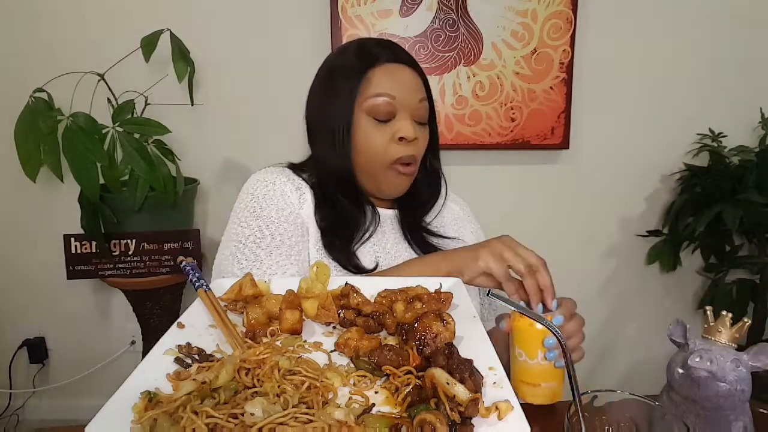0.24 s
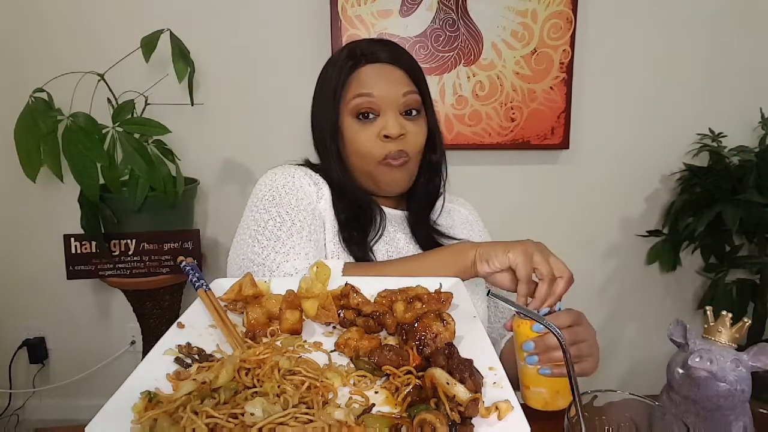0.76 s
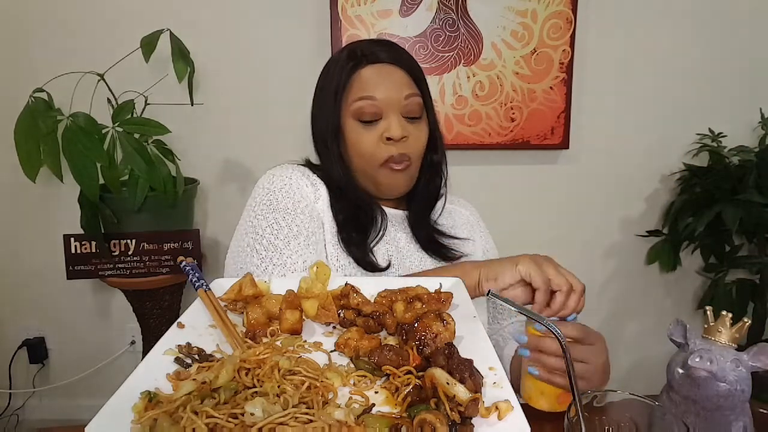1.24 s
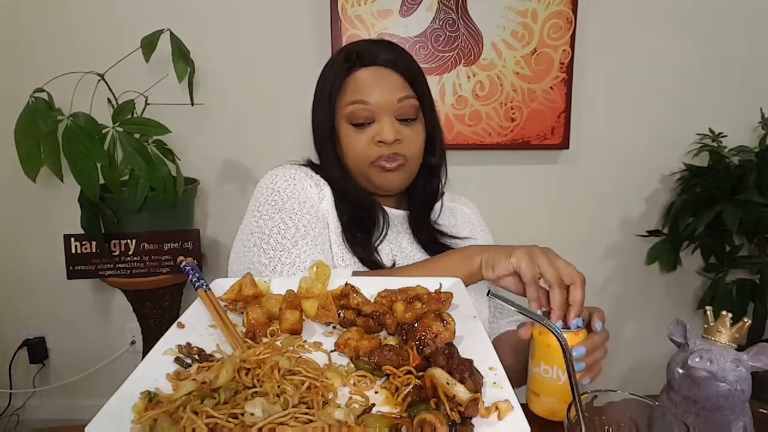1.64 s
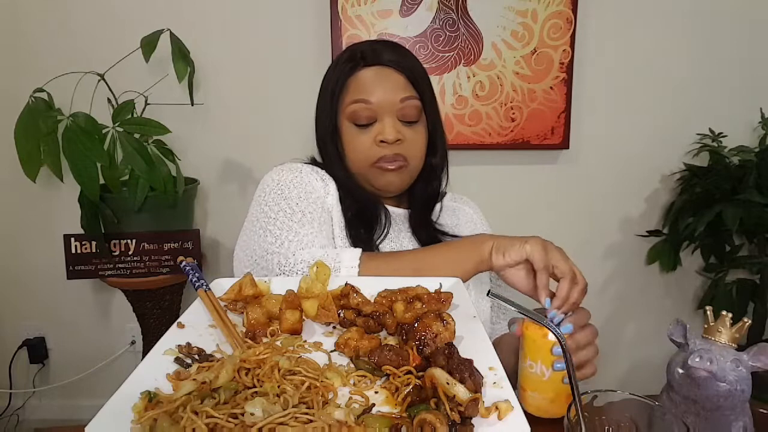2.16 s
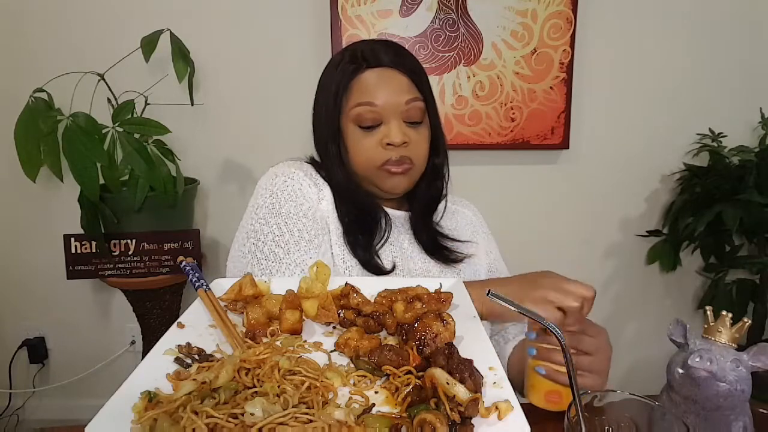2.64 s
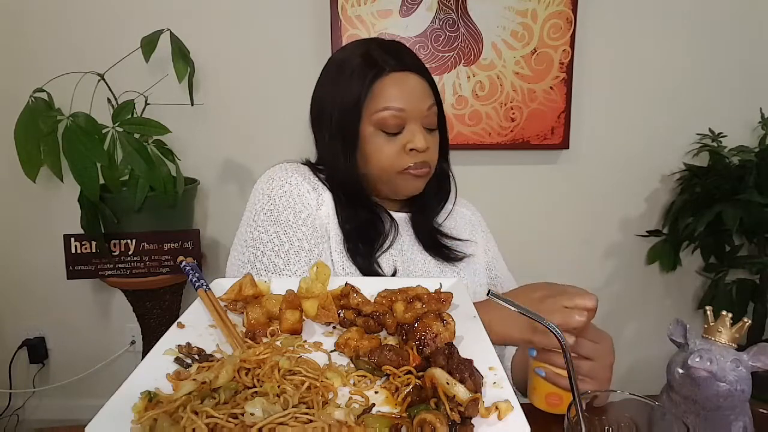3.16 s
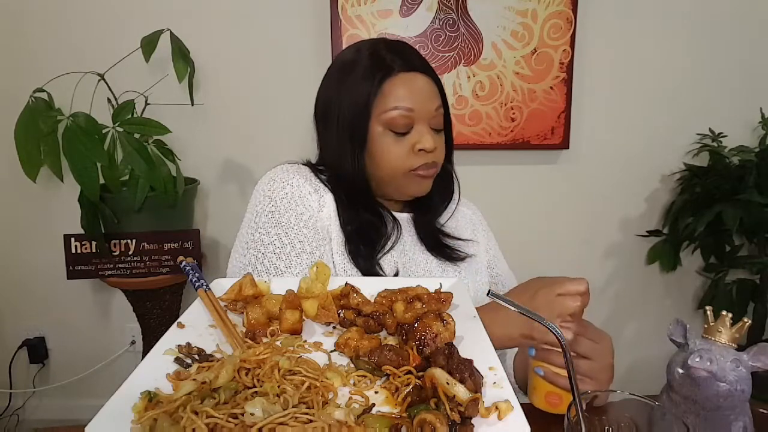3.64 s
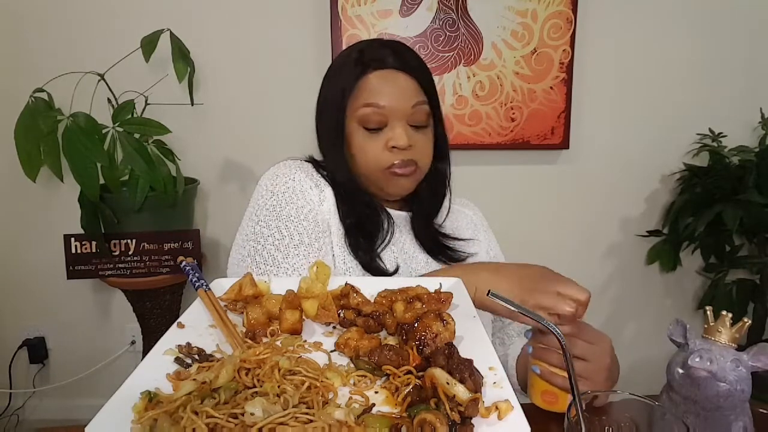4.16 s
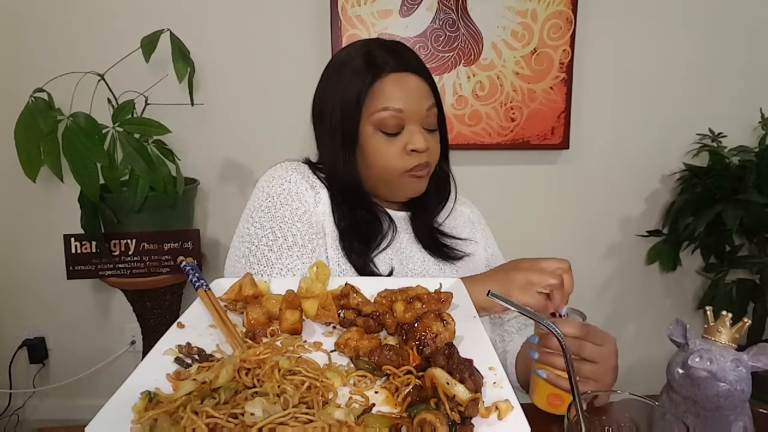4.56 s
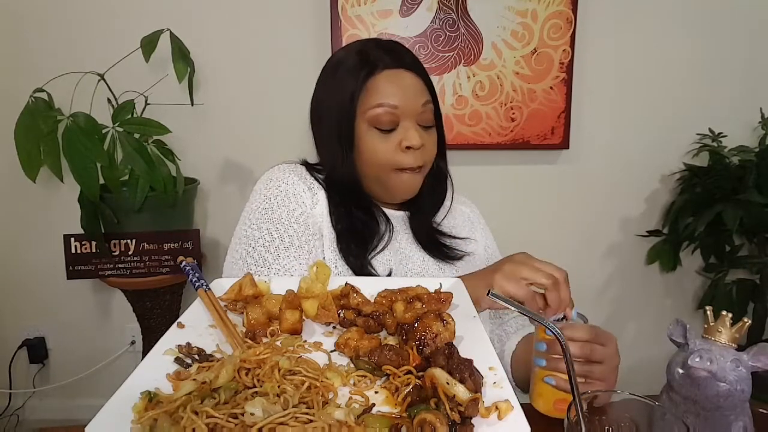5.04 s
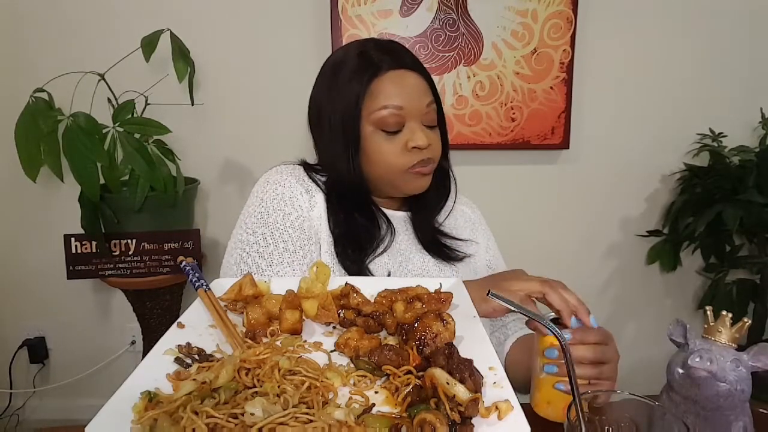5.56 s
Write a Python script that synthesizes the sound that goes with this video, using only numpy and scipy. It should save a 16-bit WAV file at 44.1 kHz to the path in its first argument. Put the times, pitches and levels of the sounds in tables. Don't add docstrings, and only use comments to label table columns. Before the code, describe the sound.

Heard from a few metres away by one microphone in a reverberant room: fingernails tick a metal tab, and a can knocks twice on a wooden table. The can is opened with a crack, a short bright hiss and a hard snap, then a softer click with a small puff. The base scrapes faintly while a distant motor whines, a strong pop bursts out, and sparse ticks and a light touch end it.

```python
import sys
import numpy as np
from scipy import signal
from scipy.fft import rfft, irfft
from scipy.io import wavfile
from scipy.ndimage import uniform_filter1d

SR = 44100
rng = np.random.default_rng(int(sys.argv[2]) if len(sys.argv) > 2 else 0)


def magnitude_from_level(level_db):
    exponent = np.asarray(level_db, float) / 20
    return 10 ** exponent


def put_to_file(sound):
    columns = np.atleast_2d(sound).T
    safe = np.clip(columns, -1, 1)
    whole_steps = np.round(safe * 32767)
    wavfile.write(sys.argv[1], SR, whole_steps.astype(np.int16))


N = 255364
LEAD = SR // 10

# (time [s], peak level [dB])
SEAL_CRACK, LID_TEAR, TAB_BEND, LID_POP = (2.9616, -15), (3.1452, -10), (3.7078, -21), (4.5583, -3)
# (frequency [Hz], level per Hz [dB])
SEAL_SPECTRUM = [(290, -84), (500, -35.5), (2300, -52), (3400, -12), (5020, -3), (7100, -19), (10500, -23),
                 (16000, -29)]
BEND_SPECTRUM = [(200, -34), (530, 6), (950, -40.5), (2600, -9), (4700, -3.5), (8000, 9), (12000, -5.5),
                 (16000, -18.5)]
POP_SPECTRUM = [(60, -35.5), (232, -3.5), (451, -10.5), (937, 6), (3250, -4.5), (4230, 5.5), (8410, -22.5),
                (16000, -28.5)]
# (frequency [Hz], level [dB], decay time t60 [s])
SEAL_MODES = [(3300, -14, 0.004), (4620, 12, 0.009), (4920, 0, 0.015), (7230, 9.5, 0.0055)]
TEAR_MODES = [(1980, -4.5, 0.011), (2225, 8, 0.0094), (3640, 11.5, 0.0068), (3900, 3, 0.0042),
              (1600, -27, 0.0049), (2800, -1, 0.0055)]
BEND_MODES = [(3180, 9, 0.0063), (2510, -2.5, 0.0089), (3890, 4, 0.016), (2167, -10, 0.024)]
POP_MODES = [(2690, 6.5, 0.0077), (2380, 6, 0.0077), (4330, -4, 0.0043), (7750, 1.5, 0.0042)]
# (frequency [Hz], level per Hz [dB])
GAS_SPECTRUM = [(180, -54), (300, -11.5), (1480, -12.5), (4020, -1), (5340, -3.5), (8640, 4.5), (14700, -6),
                (16000, -11)]
PUFF_SPECTRUM = [(1000, -17), (3000, -9), (6000, 3.5), (10000, -4.5), (13500, 1), (16000, -14)]
# (time [s], peak level [dB], ring frequency [Hz], hardness [dB], knock into the table [dB])
TICKS = [(0.2447, -39, 3500, 3, -13.5), (0.4593, -39.5, 1380, -2.5, -15), (0.9874, -42.5, 1510, -5, -8),
         (1.3208, -27, 1840, -10.5, -24), (1.479, -35.5, 1530, -7, -12.5),
         (1.6298, -26.5, 2366, -12.5, -11), (1.7186, -44.5, 2340, 6, 4), (2.4099, -38.5, 1550, -47, 5),
         (2.6773, -42.5, 2270, -6, -1), (3.6124, -38.5, 3460, -2, -28), (4.041, -44, 1094, -7, 6),
         (5.0922, -46, 1980, -11, -27), (5.456, -48, 1580, -8, -11.5), (5.7671, -27, 1890, -2.5, -24.5)]
# (time [s], peak level [dB], ring frequency [Hz], hardness [dB], knock into the table [dB])
NEAR_TICKS = [(1.226, -44.5, 1310, -18, -1), (1.6006, -56, 2250, 8, -24), (1.8794, -37, 2260, 0, -5.5),
              (2.0761, -36.5, 3900, -7, -15), (2.1387, -35, 1350, 3.5, -2), (2.2945, -49.5, 1480, 1, -12.5),
              (3.5672, -47, 3080, -18, -23), (4.148, -50.5, 1402, 1, -10), (4.8625, -28.5, 1780, 1.5, -40),
              (5.241, -49.5, 1390, 1.5, -8), (5.3386, -45.5, 1960, -12, -26)]
# (frequency [Hz], level per Hz [dB])
SNAP_SPECTRUM = [(700, -22), (1500, 1.5), (3000, 13), (5500, 6), (9000, -11.5)]
CRACK_SPECTRUM = [(3000, -32), (7000, 4), (10000, -6), (16000, -10)]
# (time [s], level [dB], frequency [Hz], decay time t60 [s])
FLEXES = [(.247, -41, 3500, 0.021), (0.461, -43.5, 5150, .005), (0.4637, -50, 1900, 0.0098),
          (.471, -36, 2050, 0.013), (0.472, -48, 1440, 0.02), (0.468, -39, 2750, .006),
          (0.488, -40, 2120, 0.0072), (.808, -52, 3450, 0.008), (1.322, -21.5, 4480, 0.0027),
          (1.634, -36, 3200, 0.01), (2.147, -43, 1340, 0.01), (3.582, -61, 5690, 0.058),
          (3.599, -45.5, 1500, .011), (3.625, -46.5, 5690, 0.039), (3.714, -33, 5560, 0.023),
          (4.206, -41, 1390, .02), (4.539, -55, 4780, 0.013), (5.097, -39.5, 3230, 0.01),
          (5.49, -55, 7900, .008), (5.245, -61, 6100, .02), (5.462, -58, 3300, 0.041),
          (5.771, -34, 3050, 0.017), (5.768, -40.5, 4640, 0.012)]
# (time [s], peak level [dB], rim clack over the knock [dB])
LANDINGS = [
    (0.8367, -12.5, -4),
    (1.3097, -19, -2),
    (2.4082, -48.5, 13),
    (5.111, -38.5, 7),
]
# (time [s], peak level [dB], rim clack over the knock [dB])
EARLIER_LANDING = (-0.033, -20.5, 0.12)
# (frequency [Hz], level [dB], decay time t60 [s])
LINGERING_HUM = (222, -44.5, 2.17)
# (frequency [Hz], level [dB], decay time t60 [s])
TABLE_MODES = [(193.3, -5.5, 0.062), (240.9, 1.5, 0.099), (299.5, 2.5, 0.05), (401.4, -6.5, 0.099),
               (484, -4, 0.033), (596.5, -9, 0.06), (860, -14, 0.037), (108.6, -9.5, 0.09),
               (722, -13.5, 0.047)]
CAN_MODES = [(1525, 8.5, 0.012), (2090, 0.5, 0.037), (2490, 8.5, 0.0035), (1190, 0, 0.017),
             (3500, 8.5, 0.0022)]
SCRAPE_MODES = [(300, 1, 0.06), (414, 2.5, 0.067), (483, 2, 0.05), (235.3, -5, 0.18), (977, -3.5, .03),
                (1450, -13, .015)]
# (time [s], peak level [dB])
NUDGES = [(3.855, -43), (3.94, -39), (4.04, -36), (4.052, -35), (4.077, -31), (4.137, -41.5),
          (4.186, -39.5)]
# (start time [s], hold [s], level [dB])
DRAG = [(0.0, 0.081, -44), (.2, 0.44, -61), (1.0, 0.36, -46.5), (1.5, 0.57, -53.5), (2.6, 0.096, -52.5),
        (3.0, 0.19, -52), (4.0, 0.38, -51.5), (4.64, 0.027, -50)]
SCRAPE = [(4.07, 0.052, -40), (4.25, 0.16, -65.5)]
FINGERS = [(1.7, 0.014, -54), (2.68, 0.03, -59.5), (4.1, .04, -60.5), (5.1, 0.019, -63.5),
           (5.48, 0.034, -69.5)]
# (time [s], frequency [Hz], level [dB])
WHINE = [(3.0, 245, -76), (3.4, 254, -63), (4.0, 276, -62), (4.45, 281, -59), (4.9, 283, -76)]
# (start time [s], hold [s], level [dB])
DRONE = [(3.35, .3, -63.5)]
# (frequency [Hz], level per Hz [dB])
FLOOR_SPECTRUM = [(21, -41), (45, -4), (217, 0.5), (734, -19), (1920, -15.5), (3190, -20), (4330, -25.5),
                  (15000, -37)]
# (frequency [Hz], decay time t60 [s])
ROOM_DECAY = [(100, 0.37), (300, 0.3), (1000, 0.81), (3000, 0.71), (7000, 0.68), (14000, 0.43)]
# (time [s], level [dB])
ECHOES = [(.0009, -17), (.0033, -13), (.0077, -9), (.017, -16.5), (.027, -16)]


def lid():
    out = gas() + puff()
    add(out, *SEAL_CRACK, coloured(SEAL_SPECTRUM))
    add(out, SEAL_CRACK[0] + 0.00046, SEAL_CRACK[1] + 3, ring(SEAL_MODES))
    add(out, *LID_TEAR, thin(ring(TEAR_MODES)))
    add(out, *TAB_BEND, coloured(BEND_SPECTRUM))
    add(out, TAB_BEND[0] + 0.0024, TAB_BEND[1] + 5, thin(ring(BEND_MODES)))
    return out


def pop():
    out = np.zeros(N + LEAD)
    s, db = LID_POP
    add(out, s, db, coloured(POP_SPECTRUM))
    add(out, s + 0.00021, db + 0.63, ring(POP_MODES))
    add(out, s + 0.0001, db - 7, crack())
    return out


def gas():
    swell_db, swell_s = -10, 0.033
    since = np.maximum(clock() - SEAL_CRACK[0], 0)
    opening = np.minimum(since / 0.003, 1)
    jet = opening * magnitude_from_level(swell_db * np.exp(-since / swell_s))
    hold = strokes([(0.026, 3.11, -34)], rise_db_per_s=0, fall_db_per_s=413)
    return jet * hold * hiss(GAS_SPECTRUM, patchy_db=1.3)


def puff():
    s = TAB_BEND[0]
    fade = strokes([(s, 0.0058, -40.5)], rise_db_per_s=0, fall_db_per_s=500)
    return (clock() > s) * fade * hiss(PUFF_SPECTRUM, patchy_db=2.0)


def thin(x):
    return signal.sosfilt(signal.butter(3, 1350, "high", fs=SR, output="sos"), x)


def crack():
    splutter_s = 0.0026
    burst = rng.standard_normal(512) * np.exp(-np.arange(512) / SR / splutter_s)
    z = rfft(burst)
    return np.convolve(coloured(CRACK_SPECTRUM), irfft(z / abs(z))[:400])


def landings():
    out = np.zeros(N + LEAD)
    for s, db, clack_db in [EARLIER_LANDING, *LANDINGS]:
        add(out, s, db - 3.0, knock())
        add(out, s, db + clack_db + 0.5, np.convolve(ring(CAN_MODES), np.hanning(14)))
        add(out, s, db + clack_db - 25.5, crack())
    add(out, EARLIER_LANDING[0], -24, coloured(SNAP_SPECTRUM))
    add(out, EARLIER_LANDING[0], LINGERING_HUM[1], ring([LINGERING_HUM], size=40000))
    for s, db in NUDGES:
        add(out, s, db, np.convolve(ring(SCRAPE_MODES), np.hanning(12)))
    return out


def knock():
    swing = ring(TABLE_MODES) * (1 - np.exp(-np.arange(8000) / SR / 0.0025))
    second = np.pad(swing, (round(0.018 * SR), 0))[:8000]
    return swing + magnitude_from_level(-5.5) * second


def ticks(rows, ring_s):
    out = np.zeros(N + LEAD)
    for s, db, hz, hard_db, knock_db in rows:
        add(out, s, db - 0.5, ring([(hz, 0, ring_s)]))
        add(out, s, db + 2.5 + 0.23 * hard_db, coloured(SNAP_SPECTRUM))
        add(out, s, db + hard_db - 2.5, crack())
        add(out, s, db + knock_db, knock())
    return out


def creaks():
    out = np.zeros(N + LEAD)
    for s, db, hz, t60 in FLEXES:
        add(out, s, db, ring([(hz, 0, t60)]))
    return out


def rubbing():
    drag = strokes(DRAG, rise_db_per_s=120, fall_db_per_s=45)
    out = magnitude_from_level(-6.5) * drag * slips(TABLE_MODES, per_s=260, spread_db=1.6)
    scrape = strokes(SCRAPE, rise_db_per_s=600, fall_db_per_s=199)
    out += scrape * slips(SCRAPE_MODES, per_s=340, spread_db=2.5)
    fingers = strokes(FINGERS, rise_db_per_s=76, fall_db_per_s=114)
    return out + fingers * slips(CAN_MODES, per_s=2200, spread_db=5.0)


def motor():
    s, hz, db = np.transpose(WHINE)
    t = clock()
    drift = rng.standard_normal((2, len(t)))
    waver = evened(uniform_filter1d(uniform_filter1d(drift, size=3000), size=3000))
    phase = 2 * np.pi * np.cumsum(np.interp(t, s, hz)) / SR
    whine = magnitude_from_level(np.interp(t, s, db, left=-120, right=-120) + 1.8 * waver[0]) * np.sin(phase)
    drone = strokes(DRONE, rise_db_per_s=60, fall_db_per_s=30) * np.sin(2 * np.pi * 172 * t)
    return whine + magnitude_from_level(2.5 * waver[1]) * drone


def background():
    return magnitude_from_level(-61.5) * hiss(FLOOR_SPECTRUM, patchy_db=-3.5)


def room(x, tail_db):
    taps = np.zeros(SR)
    at = np.arange(100, SR - 10, 10) + rng.integers(0, 10, (SR - 101) // 10)
    taps[at] = rng.choice([-1., 1.], len(at))
    hz, t, z = signal.stft(taps, SR, nperseg=256)
    decay = magnitude_from_level(-60 * t / read(ROOM_DECAY, hz)[:, None])
    tail = signal.istft(z * decay, SR, nperseg=256)[1][:SR]
    tail *= magnitude_from_level(tail_db) / np.linalg.norm(tail)
    tail[0] += 1
    for k, (s, db) in enumerate(ECHOES):
        tail[round(s * SR)] += (-1) ** k * magnitude_from_level(db)
    return signal.fftconvolve(x, tail)[:N + LEAD]


def ring(modes, size=8000):
    t = np.arange(size) / SR
    return sum(magnitude_from_level(db - 60 * t / t60) * np.sin(2 * np.pi * hz * t) for hz, db, t60 in modes)


def coloured(spectrum):
    hz = abs(np.fft.fftfreq(4096, 1 / SR))
    log_gain = np.log(magnitude_from_level(np.maximum(read(spectrum, hz), -100)))
    return np.fft.ifft(np.exp(np.conj(signal.hilbert(log_gain)))).real[:2048]


def hiss(spectrum, patchy_db):
    frames, hz = (N + LEAD) // 256 + 5, np.fft.rfftfreq(1024, 1 / SR)
    a, b, patches = rng.standard_normal((frames, 513, 3)).T
    patches = uniform_filter1d(patches, size=12, axis=0)
    patches = evened(uniform_filter1d(patches, size=12, axis=1))
    z = (a + 1j * b) * magnitude_from_level(read(spectrum, hz)[:, None] + patchy_db * patches)
    return evened(signal.istft(z, nperseg=1024, noverlap=768)[1][:N + LEAD])


def slips(modes, per_s, spread_db):
    chance, sign = rng.random((2, N + LEAD))
    strength = np.minimum(rng.exponential(1, N + LEAD), 4)
    size = magnitude_from_level(spread_db * strength) * np.sign(sign - 0.5)
    return evened(signal.oaconvolve(size * (chance < per_s / SR), ring(modes))[:N + LEAD])


def strokes(rows, rise_db_per_s, fall_db_per_s):
    t = clock()
    gain = 0
    for s, hold, db in rows:
        rise = rise_db_per_s * np.maximum(s - t, 0)
        fall = fall_db_per_s * np.maximum(t - s - hold, 0)
        gain = gain + magnitude_from_level(db - rise - fall)
    return gain


def add(mix, s, db, sound):
    part = mix[round(s * SR) + LEAD:][:len(sound)]
    part += (magnitude_from_level(db) * sound / abs(sound).max())[:len(part)]


def clock():
    return (np.arange(N + LEAD) - LEAD) / SR


def evened(x):
    return x / np.sqrt(np.mean(x ** 2) + 1e-20)


def read(points, hz):
    f, value = np.transpose(points)
    return np.interp(np.log(hz + 1), np.log(f + 1), value)


def scene():
    mix = room(lid(), tail_db=2.0)
    mix += room(pop(), tail_db=8.0)
    mix += room(ticks(TICKS, ring_s=0.013) + creaks(), tail_db=-0.5)
    mix += room(ticks(NEAR_TICKS, ring_s=0.011), tail_db=-3.0)
    mix += room(landings() + rubbing(), tail_db=-0.2)
    mix = signal.sosfilt(signal.butter(2, 90, "high", fs=SR, output="sos"), mix)
    mix += motor() + background()
    return np.tile(mix[LEAD:], (2, 1))


def band_limit(x):
    return signal.sosfilt(signal.butter(12, 17090, fs=SR, output="sos"), x)


def record(dry):
    x = np.tanh(dry / 1.1) * 1.1
    low_pass = signal.firwin(301, 16100, window=("kaiser", 9), fs=SR)
    x = signal.oaconvolve(x, low_pass[None], "same")
    band = signal.butter(4, [8400, 11000], "band", fs=SR, output="sos")
    treble = signal.sosfilt(band, np.roll(x[0], 900))
    x = x + magnitude_from_level(-22) * np.array([treble, -treble])
    return band_limit(x)


dry = scene()
out = record(dry)
put_to_file(out)
```